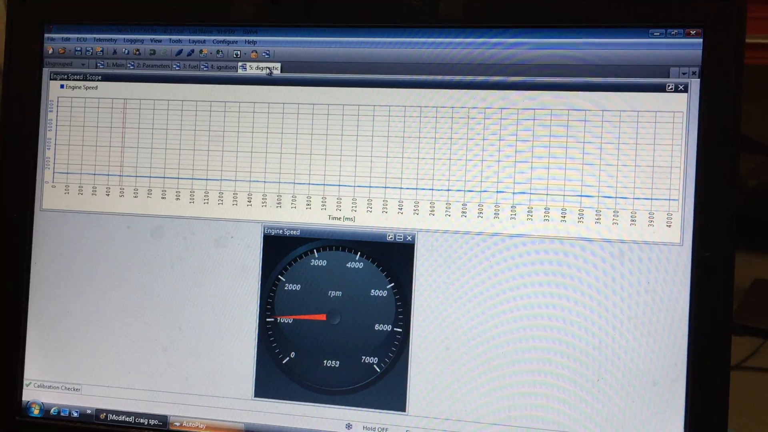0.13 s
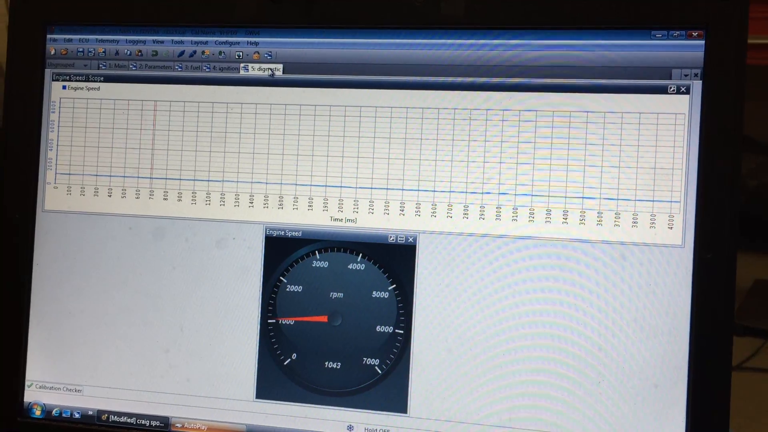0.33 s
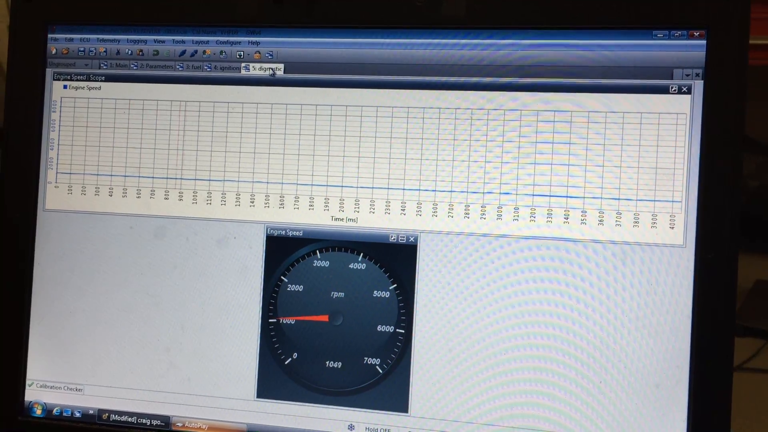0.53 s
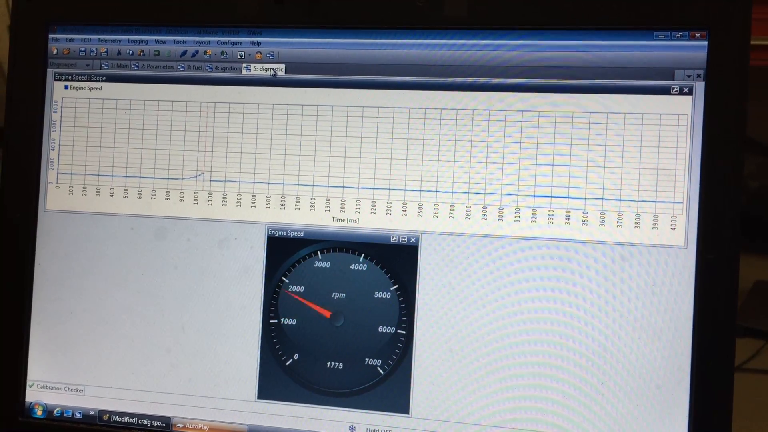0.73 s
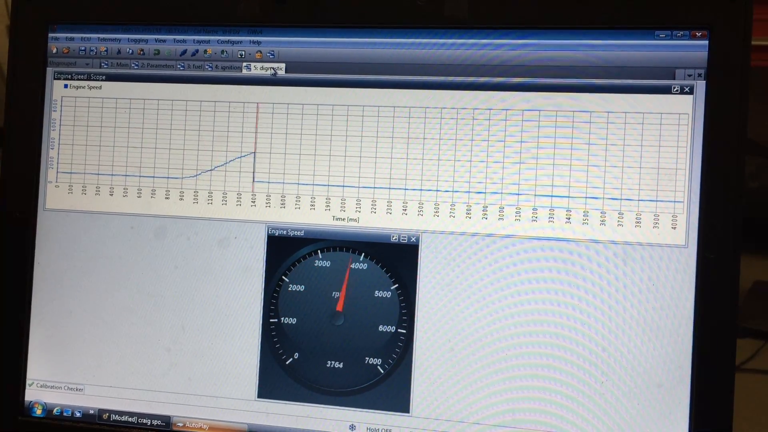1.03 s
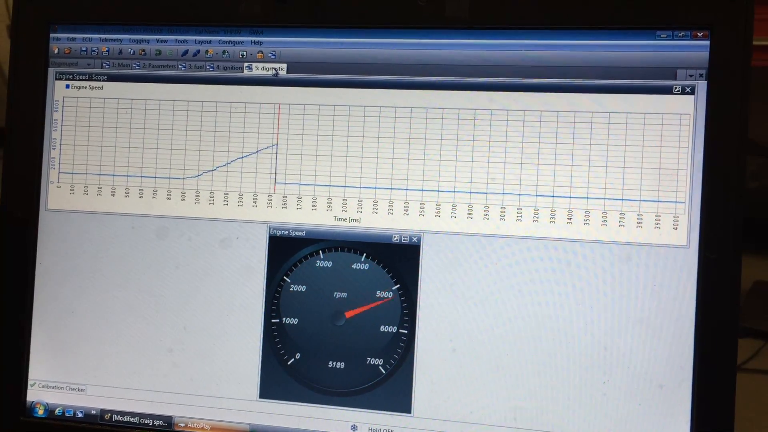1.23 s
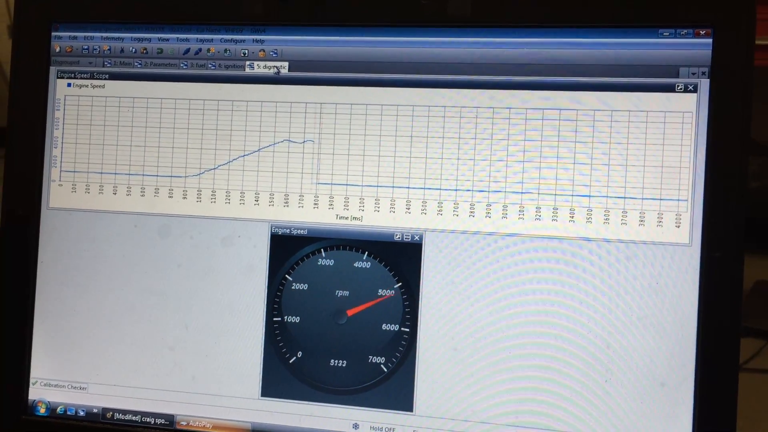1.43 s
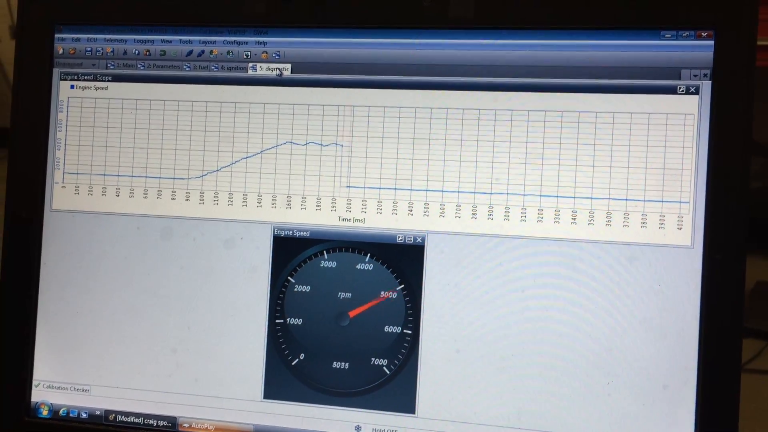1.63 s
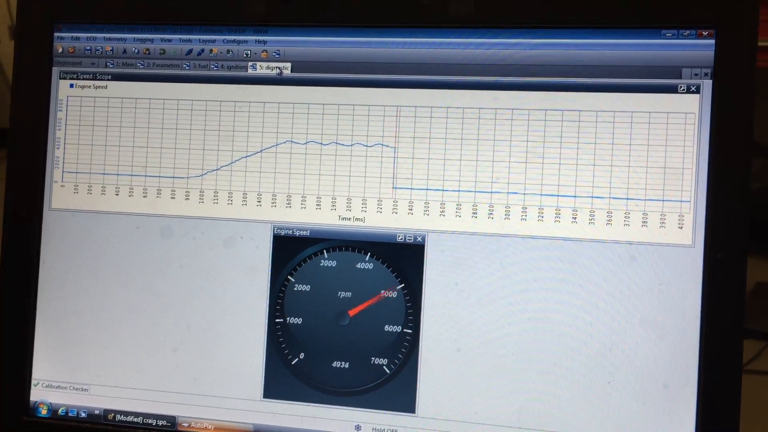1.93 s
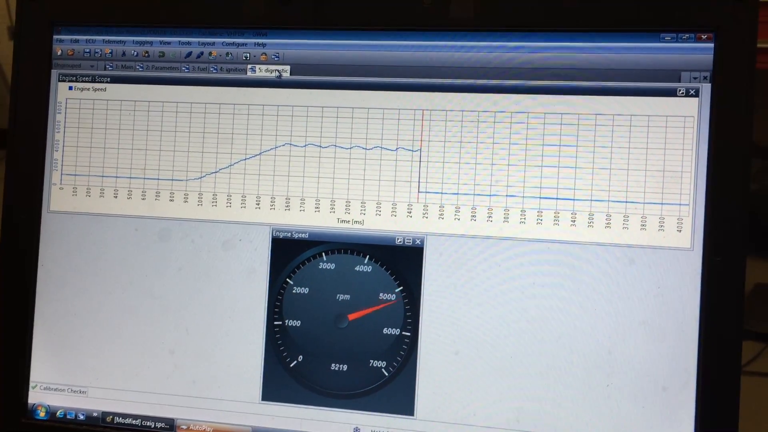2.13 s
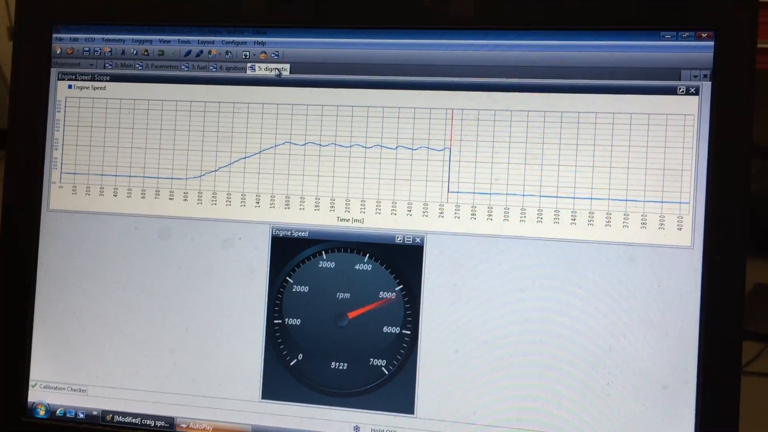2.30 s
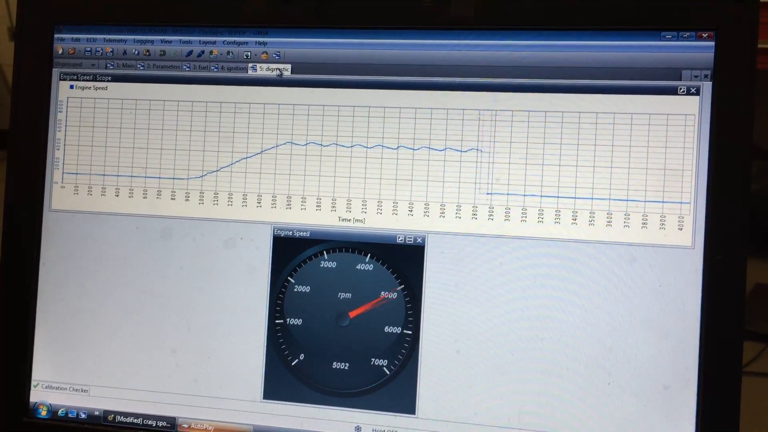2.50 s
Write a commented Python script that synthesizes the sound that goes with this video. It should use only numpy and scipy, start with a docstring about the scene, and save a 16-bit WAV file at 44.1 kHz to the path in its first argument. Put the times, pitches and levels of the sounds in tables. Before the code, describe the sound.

Car engine idles low, then revs up hard and stutters against its rev limiter indoors

```python
"""A hard room with an engine test bench, all sources heard in one channel through a small microphone.
A four-cylinder engine idles, the throttle opens, and the speed climbs until it bounces on the rev limiter,
which cuts the firing about seven times a second. Firing orders boom as sines through exhaust and room
resonances; clicks and gas noise ring a pipe; loose parts rattle as filtered clicks at the cuts.
Shaped noise gives the patchy mechanical bed, and high-passed noise the intake hiss."""
import sys
import numpy as np
from scipy import signal
from scipy.io import wavfile
from scipy.ndimage import uniform_filter1d

SR = 44100
rng = np.random.default_rng(int(sys.argv[2]) if len(sys.argv) > 2 else 0)


def pcm_store(signal):
    """Save signal as 16-bit PCM."""
    levels = np.round(np.clip(np.atleast_2d(signal), -1, 1) * 32767)
    wavfile.write(sys.argv[1], SR, levels.astype(np.int16).T)


def level_to_linear(level):
    """Convert decibel levels to linear amplitude factors, elementwise."""
    exponent = np.asarray(level, float) / 20
    return 10 ** exponent


N = 117306
T = np.arange(N) / SR  # time [s]

# Run-up of the engine: (time [s], firing rate [Hz], boom level [dB], pipe ring level [dB])
SPEED = [(0.09, 35.25, -18, -46), (0.11, 35.38, -15.5, -51), (0.204, 35.43, -15, -57),
         (0.214, 35.8, -13, -56), (0.246, 35.3, -13, -49), (0.27, 35.56, -24, -56),
         (0.396, 34.72, -18, -62), (0.486, 34.87, -31, -50), (0.5, 34.8, -36, -51),
         (0.528, 35.22, -19, -45), (0.566, 35, -15, -57), (0.65, 35.7, -20.5, -32),
         (0.712, 47.34, -11.5, -23), (0.758, 56.25, -9.5, -27), (0.802, 64.78, -16, -21),
         (0.872, 78.9, -11, -21), (0.942, 95.88, -19.5, -18), (1.022, 114.0, -10, -22),
         (1.12, 133.8, -24, -25.5), (1.182, 143, -28, -28), (1.214, 148.3, -26, -26.5),
         (1.248, 158.3, -29, -31.5), (1.294, 167.8, -20, -30.5), (1.34, 171.2, -24, -17)]
# Limiter cycles: (cut [s], time until firing is back [s], change of boom [dB], rattle level [dB])
CUTS = [(1.322, .05, -7, -25), (1.466, .065, -11, -22), (1.618, .07, -14, -27), (1.758, .075, -15, -24),
        (1.903, .07, -12, -27), (2.064, .068, -16, -24), (2.204, .072, -12, -27), (2.352, .068, -11, -27),
        (2.505, .07, -14, -24), (2.655, .06, -12, -27)]
# Exhaust and room response to the firing orders: (frequency [Hz], relative level [dB])
BOOM_RESPONSE = [(35, -17), (55, 1), (71, -4), (90, -6), (106, -7.5), (118, 4), (142, -15), (170, 1.5),
                 (192, -5.5), (215, 6.5), (250, -15), (300, -21.5), (400, -29.5)]
# Room modes that ring on after the orders sweep past: (frequency [Hz], width [Hz], relative level [dB])
ROOM_MODES = [(71.6, 4.8, 2), (113.8, 30, -9), (173.8, 19.4, -10), (214.6, 9, -1.5)]
# Lines that outlast the cuts: (multiple of firing rate [1], level [dB], change in a cut [dB])
HELD_LINES = [(.75, -40, 3.5), (1.25, -38, 8), (2, -33, -2.5), (2.25, -49, -4), (3, -26, 1.5),
              (4, -40.5, -2.5)]
# Pipe modes: (frequency [Hz], width [Hz], relative level [dB])
PIPE_MODES = [(390, 36, -6), (531.3, 51, 2), (580, 46, -3.5), (646, 50, -4), (822, 63, -16),
              (1463, 150, -12.5)]
# Resonances of the loose parts: (frequency [Hz], width [Hz], relative level [dB])
RATTLE_MODES = [(1500, 338, 0.5), (2392.4, 660, -3.5), (520, 240, 2.5)]
# Mechanical noise: (time [s], level above 1 kHz [dB], share of the high-speed colour [0-1])
NOISE = [(.09, -31, 0), (.4, -32, 0), (.6, -31, .1), (.72, -28.5, 0.06), (.9, -30.5, 0.57),
         (1.04, -31.5, 0.67), (1.09, -32, 0.71), (1.11, -27, 0.58), (1.25, -27.5, 0.74), (1.34, -24, 1),
         (1.5, -25, 0.99)]
# Colour of the mechanical noise at idle: (frequency [Hz], relative density [dB per Hz])
IDLE_COLOUR = [(24, -32), (45, -10.5), (120, -7.5), (200, -15), (290, -12), (463, -24.5), (625, -18),
               (865, -26.5), (1030, -23), (2180, -28.5), (4000, -36.5), (7000, -44.5), (10500, -51),
               (12000, -51.5), (15700, -56)]
# Colour of the mechanical noise at high speed: (frequency [Hz], relative density [dB per Hz])
HIGH_COLOUR = [(24, -54), (45, -25), (109, -16.5), (200, -13.5), (261, -17), (343, -25.5), (430, -21),
               (560, -18.5), (745, -25), (1500, -20.5), (1830, -24), (2350, -25), (2870, -30), (5000, -34),
               (6390, -35.5), (10500, -44.5), (15700, -48.5)]
# Intake hiss before its surge: (time [s], level [dB])
AIR = [(.09, -54), (.62, -54), (.74, -41), (.95, -41.5), (1.07, -49), (1.18, -44), (1.35, -43), (1.45, -40)]

IDLE_HZ = SPEED[0][1]
LIMIT_HZ, SAG_HZ, BOOM_SAG_HZ = 171, 4.2, 4.966  # top rate, its drop in a cut, extra drop of the lowest order
LIMIT_BOOM_DB, LIMIT_RING_DB = -17.5, -27.5  # levels at the limiter, boom before the cuts
SHUT_S, RETURN_S = .02, .06  # half-length of the fade into a cut, full length of the fade back
RATTLE_S = .013
WANDER_DB, WANDER_HZ = 1.5, 10  # drift of each order at idle (rms), its highest rate
FLUTTER, SMEAR = .3, .2  # firing unevenness at idle [share], phase spread [rad per order squared]
QUIVER_DB, QUIVER_HZ = 2, 45  # drift of the held lines (rms), its highest rate
RING_SCATTER, RING_JITTER = 0.28, 0.046  # spread of click size [share], of timing [firing intervals]
RING_ROUGH = 0.61  # gas noise weight against the clicks [0-1]
RATTLES_PER_S = 2500  # mean click rate
PATCH_DB, GATE = 0.73, 0.075  # patchiness (rms), puff of noise with each firing [share]
AIR_HZ, AIR_SURGE_DB = 7000, 2  # high-pass corner, swell toward each cut


def engine(fire, cut, sag):
    """Boom, held lines and pipe ring all follow one firing-rate curve."""
    at_limit = T > SPEED[-1][0]
    hz = np.where(at_limit, LIMIT_HZ - SAG_HZ * sag, curve(SPEED, axis=1))
    turns = np.cumsum(hz) / SR  # firings so far
    boom_level = np.where(at_limit, fire * level_to_linear(LIMIT_BOOM_DB), level_to_linear(curve(SPEED, axis=2)))
    ring_level = level_to_linear(np.where(at_limit, LIMIT_RING_DB, curve(SPEED, axis=3)))
    tones = boom(hz, boom_level, sag * at_limit) + held_lines(turns, cut) + pipe(turns, hz, ring_level)
    return tones, turns


def boom(hz, level, sag, count=8):
    """Harmonics of the firing rate in step, coloured by the response they sweep through."""
    response_hz, response_db = np.transpose(BOOM_RESPONSE)
    unsteadiness = IDLE_HZ / hz  # about 1 at idle, shrinks as the speed rises
    out, power = np.zeros(N), np.zeros(N)
    for order in range(1, count + 1):
        order_db = np.interp(np.log(order * hz), np.log(response_hz), response_db)
        gain = level_to_linear(order_db + WANDER_DB * unsteadiness * wander(WANDER_HZ))
        order_hz = order * hz - (order == 1) * BOOM_SAG_HZ * sag
        phase = 2 * np.pi * np.cumsum(order_hz) / SR + SMEAR * order ** 2
        out += gain * np.sqrt(2) * np.cos(phase)
        power += gain ** 2
    firing = np.cumsum(hz) / SR
    uneven = np.interp(firing, np.arange(N // 100), rng.standard_normal(N // 100))
    out = out * (1 + FLUTTER * unsteadiness * uneven)
    out = level * out / np.sqrt(power)
    return out + 2 * modes(out, ROOM_MODES)


def held_lines(turns, cut):
    """Sines at multiples of the firing rate carry on through the cuts at top speed."""
    fade_in = np.interp(T, [CUTS[0][0] - RETURN_S, CUTS[0][0]], [0, 1])
    out = np.zeros(N)
    for multiple, db, cut_db in HELD_LINES:
        out += level_to_linear(db + cut_db * cut + QUIVER_DB * wander(QUIVER_HZ)) * line(multiple * turns)
    return fade_in * out


def pipe(turns, hz, level):
    """Uneven firing clicks and gas noise ring the resonances of the pipe."""
    at = np.flatnonzero(np.diff(np.floor(turns))) + 1  # sample of each firing
    late, size = rng.standard_normal((N // 100, 2))[:len(at)].T
    place = np.clip(at + RING_JITTER * late * SR / hz[at], 0, N - 1).astype(int)
    clicks = np.zeros(N)
    clicks[place] = (1 + RING_SCATTER * size) * np.sqrt(SR / hz[at])  # equal power at any speed
    gas = rng.standard_normal(N)
    blow = np.sqrt(1 - RING_ROUGH) * clicks + np.sqrt(RING_ROUGH) * gas
    return level * evened(modes(blow, PIPE_MODES))


def limiter():
    """Each cut weakens the firing, lets the speed sag until firing is back, and sets off the rattle."""
    fire_db, cut, sag, chatter = np.zeros((4, N))
    ends = [row[0] for row in CUTS[1:]] + [N / SR + 1]
    for (start, off, db, rattle_db), end in zip(CUTS, ends):
        back = start + off
        fades = [start - SHUT_S, start + SHUT_S, back - RETURN_S / 2, back + RETURN_S / 2]
        shape = np.interp(T, fades, [0, 1, 1, 0])
        fire_db += db * shape
        cut += shape
        sag += np.interp(T, [start, back, end], [0, 1, 0])
        burst = [start, start + RATTLE_S / 2, start + RATTLE_S, start + 2 * RATTLE_S]
        # the first value also holds before the cut, as a very faint chatter
        chatter += level_to_linear(rattle_db) * np.interp(T, burst, [0.00096, 1, 1.0, 0])
    return level_to_linear(fire_db), np.minimum(cut, 1), sag, chatter


def rattle(level):
    """Loose parts chatter at each cut: random clicks ring their resonances."""
    clicks = rng.standard_normal(N) * (rng.random(N) < RATTLES_PER_S / SR)
    return level * evened(modes(clicks, RATTLE_MODES))


def machinery(turns):
    """Patchy mechanical noise changes colour with speed and puffs with each firing."""
    frames, hz = N // 256 + 5, np.fft.rfftfreq(1024, 1 / SR)
    real, imag, patches = rng.standard_normal((frames, 513, 3)).T
    patches = uniform_filter1d(patches, size=10, axis=0)
    patches = evened(uniform_filter1d(patches, size=10, axis=1))
    colours = []
    for table in (IDLE_COLOUR, HIGH_COLOUR):
        table_hz, table_db = np.transpose(table)
        db = np.interp(np.log(hz + 1), np.log(table_hz), table_db)
        above_1k = np.mean(level_to_linear(2 * db) * (hz > 1000))
        colours.append(db - 10 * np.log10(above_1k))  # equal power above 1 kHz
    idle, high = colours
    share = curve(NOISE, axis=2, t=np.arange(frames) * 256 / SR)
    field = level_to_linear(idle[:, None] * (1 - share) + high[:, None] * share + PATCH_DB * patches)
    spectrum = real + 1j * imag
    white = signal.istft(spectrum, nperseg=1024, noverlap=768)[1]
    noise = signal.istft(spectrum * field, nperseg=1024, noverlap=768)[1][:N] / white.std()
    return level_to_linear(curve(NOISE, axis=1)) * noise * (1 + GATE * np.cos(2 * np.pi * turns))


def air(sag):
    """Intake hiss: high-passed noise that swells toward each cut."""
    sos = signal.butter(2, AIR_HZ, "high", fs=SR, output="sos")
    surge = np.where(T > CUTS[0][0], AIR_SURGE_DB * (.5 - sag), 0)
    return level_to_linear(curve(AIR, axis=1) + surge) * evened(signal.sosfilt(sos, rng.standard_normal(N)))


def modes(x, table):
    """Sum of fixed resonances of alternating sign, each a one-pole resonator applied twice."""
    out = np.zeros(N)
    for k, (hz, width, db) in enumerate(table):
        r = np.exp(-np.pi * width / SR)
        pole = [1, -r * np.exp(2j * np.pi * hz / SR)]
        once = signal.lfilter([1 - r], pole, x)
        out += (-1) ** k * level_to_linear(db) * signal.lfilter([1 - r], pole, once).real
    return out


def line(turns):
    """A sine of rms 1 and random phase."""
    return np.sqrt(2) * np.sin(2 * np.pi * (turns + rng.random()))


def wander(hz):
    """Random drift of rms 1: noise low-passed at hz."""
    return evened(signal.lfilter(*signal.butter(2, hz, fs=SR), rng.standard_normal(N)))


def evened(x):
    """Scales to rms 1."""
    return x / np.sqrt(np.mean(x ** 2) + 1e-20)


def curve(rows, axis, t=T):
    """Reads one column of a table over time."""
    rows = np.array(rows)
    return np.interp(t, rows[:, 0], rows[:, axis])


def scene():
    """Engine tones in front, then mechanical noise, hiss and rattle, summed to one channel."""
    fire, cut, sag, chatter = limiter()
    tones, turns = engine(fire, cut, sag)
    return (tones + machinery(turns) + air(sag) + rattle(chatter))[None]


def low_pass(x):
    """Removes everything above the highest recorded frequency."""
    return signal.sosfilt(signal.butter(12, 15860, fs=SR, output="sos"), x)


def record(dry):
    """A small microphone rolls off the bass below 38 Hz; the sound sets in abruptly."""
    rolled_off = signal.sosfilt(signal.butter(4, 38, "high", fs=SR, output="sos"), dry)
    mix = rolled_off * np.clip((T - 0.0824) / 0.0023, 0, 1)  # onset [s], fade-in length [s]
    return low_pass(mix)


dry = scene()
out = record(dry)
pcm_store(out)
```